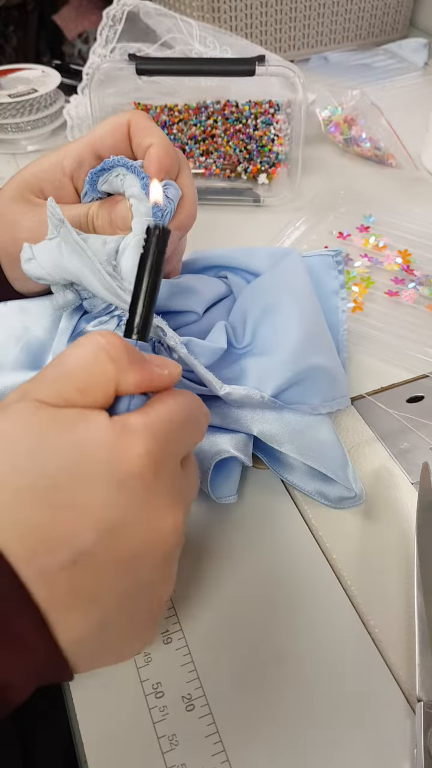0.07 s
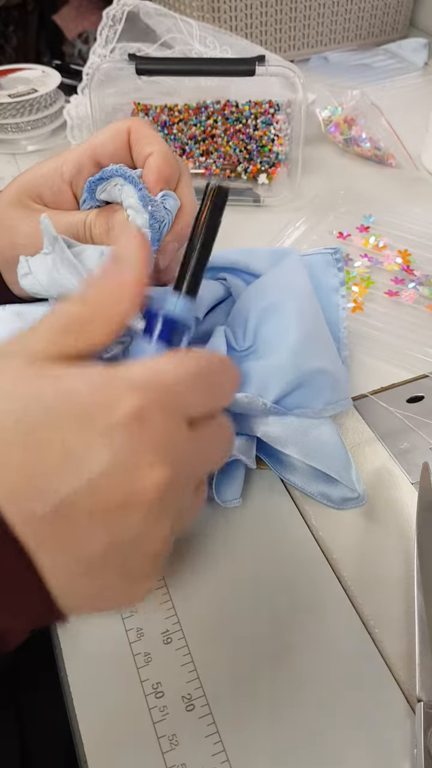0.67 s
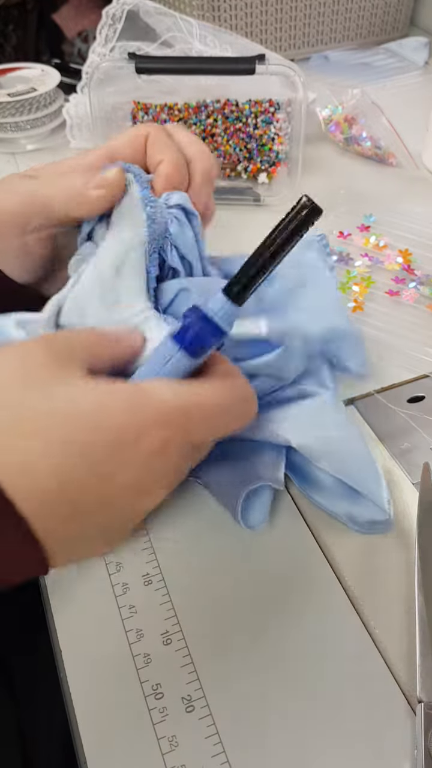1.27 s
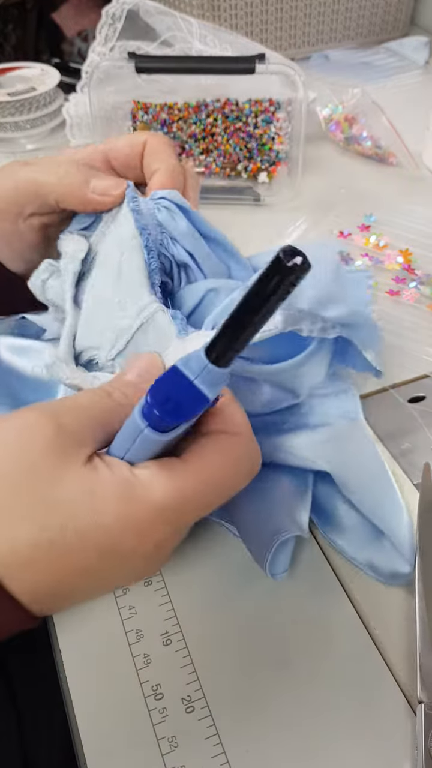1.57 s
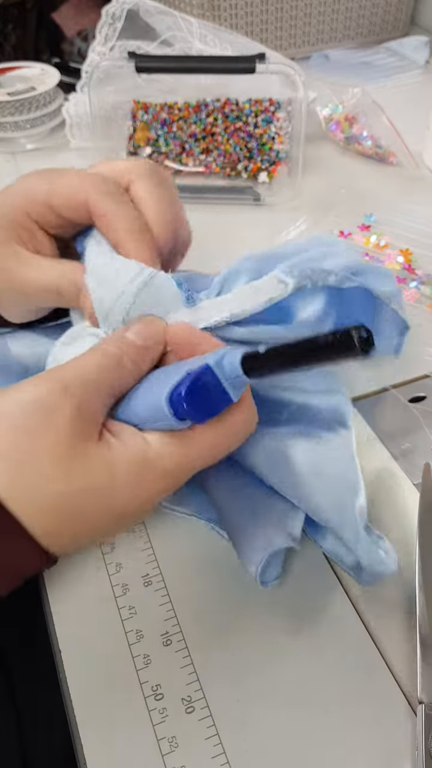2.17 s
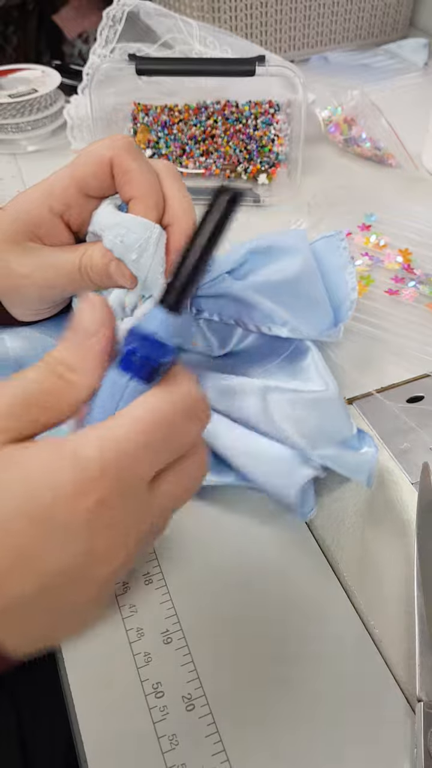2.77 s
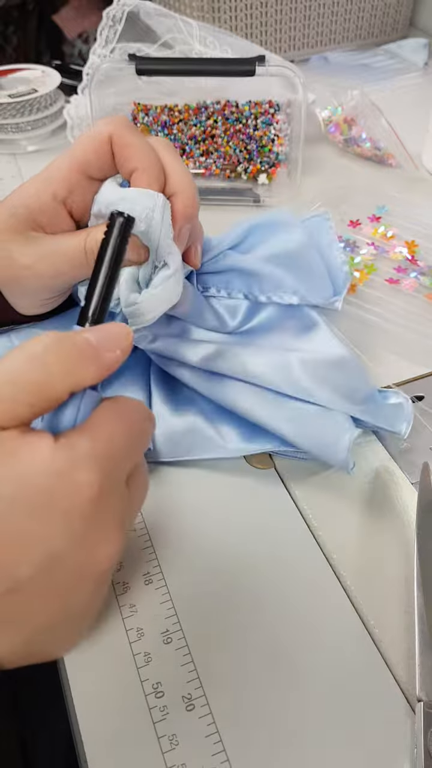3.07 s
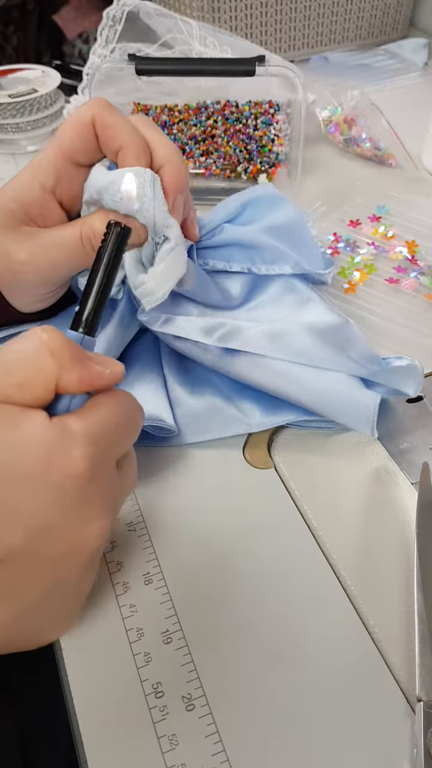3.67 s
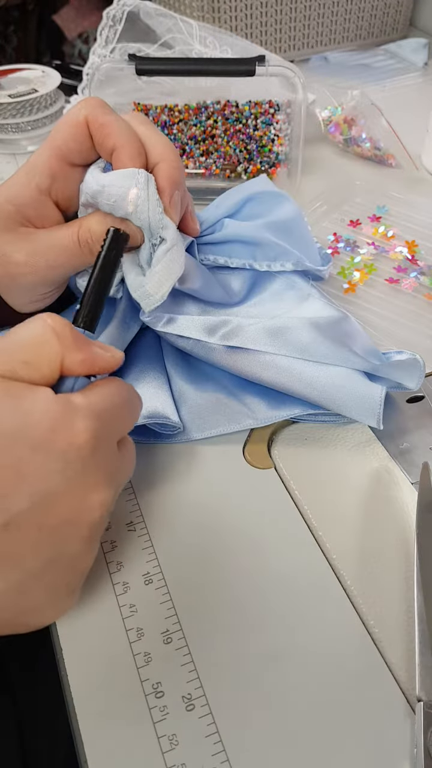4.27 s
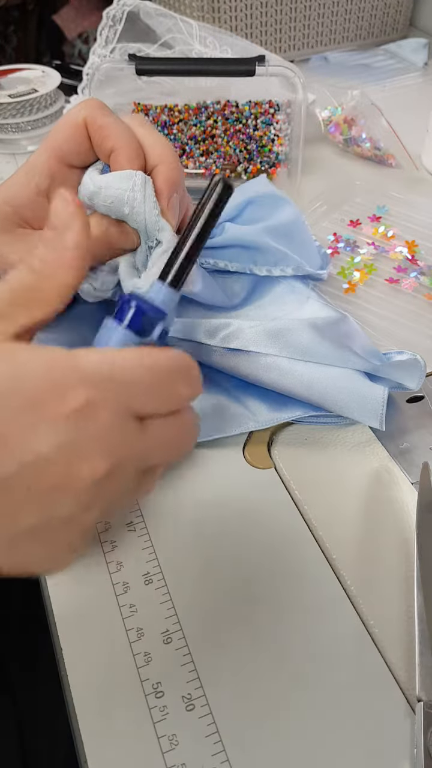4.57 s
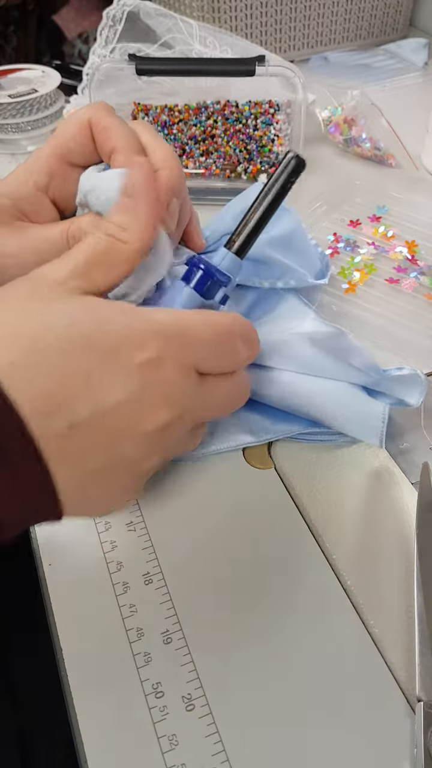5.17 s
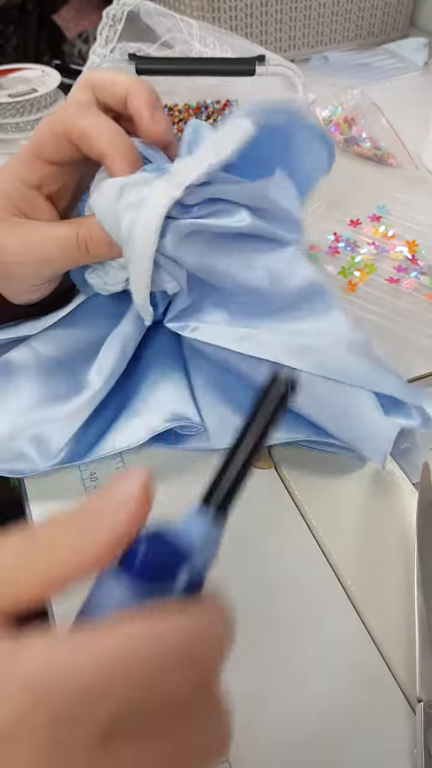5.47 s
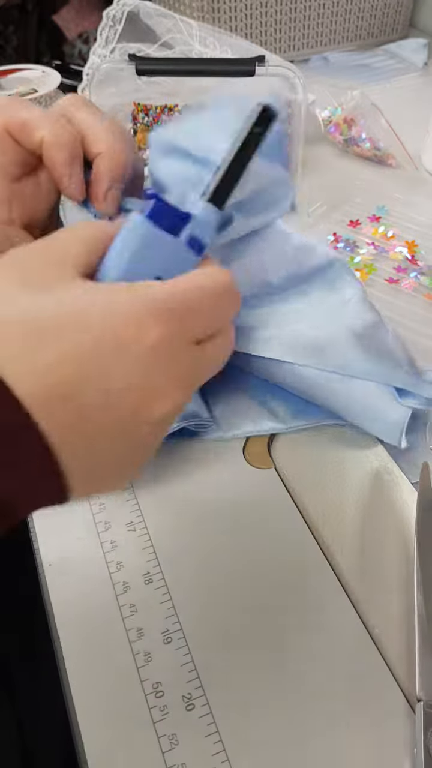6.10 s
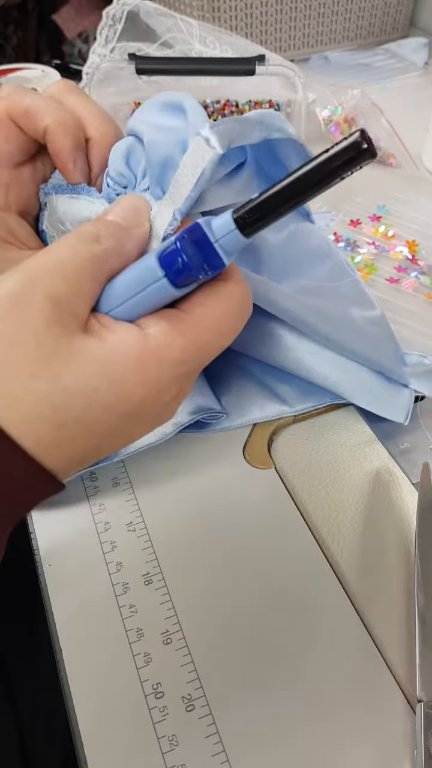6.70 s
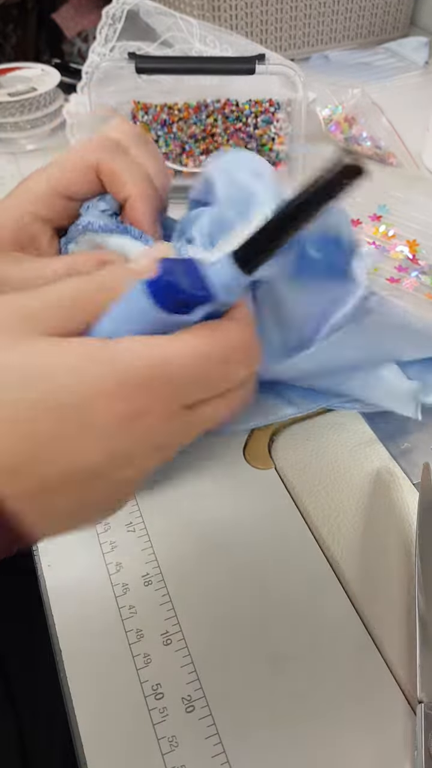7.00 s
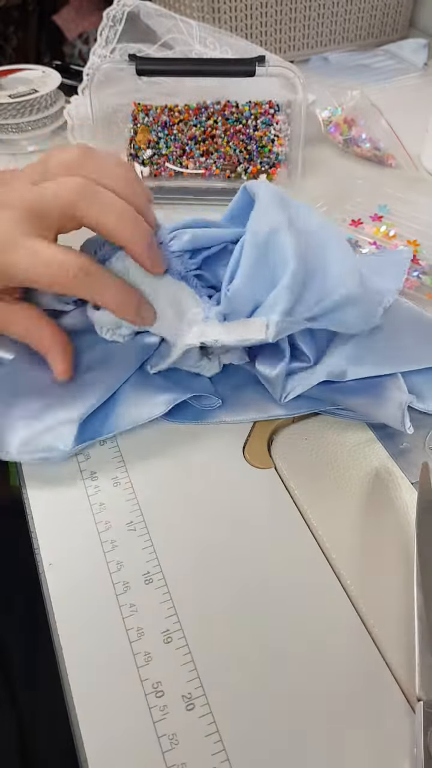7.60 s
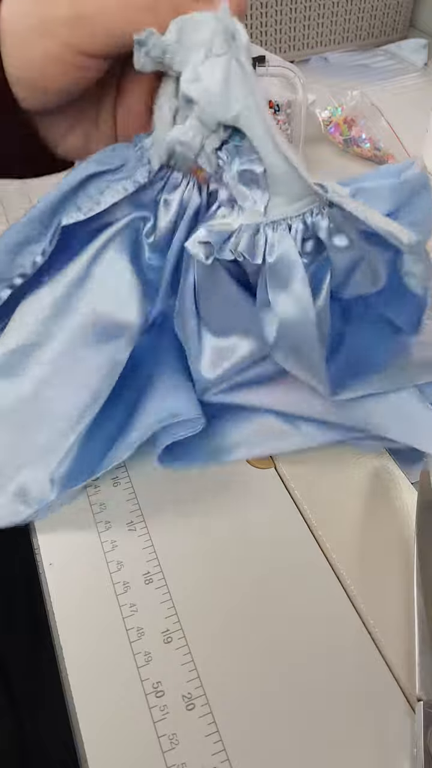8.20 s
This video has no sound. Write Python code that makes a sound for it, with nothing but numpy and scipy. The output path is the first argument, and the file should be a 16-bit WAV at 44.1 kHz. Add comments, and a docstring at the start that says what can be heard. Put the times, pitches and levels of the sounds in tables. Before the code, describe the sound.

Close, soft cloth swishes and sharp plastic lighter clicks, ending as the lighter is set down with a clack and brief scrape.

```python
"""A small gas flame flutters in a quiet room until the trigger of a long plastic lighter clicks free. Close by,
hands singe the edge of a satin doll's dress: the cloth swishes, rasps and snags as the fingers turn and rub it.
The trigger creaks down, a piezo hammer cracks, and a fainter flame burns for a second until the trigger springs
back. The nozzle knocks against the bead box once; at the end the lighter clacks down on the craft table to the
right and scrapes a little way."""
import sys
import numpy as np
from scipy import signal
from scipy.fft import rfft, irfft, next_fast_len
from scipy.io import wavfile
from scipy.ndimage import uniform_filter1d

SR = 44100
rng = np.random.default_rng(int(sys.argv[2]) if len(sys.argv) > 2 else 0)


def dump_mix(stems):
    """Bounce the given channels to the path in sys.argv[1] as a 16-bit WAV at rate SR."""
    frames = np.atleast_2d(stems).T  # one column per channel
    limited = np.clip(frames, -1, 1)  # hard clip at full scale
    pcm = np.round(limited * 32767).astype(np.int16)
    wavfile.write(sys.argv[1], SR, pcm)


N = 372644
TIME_S = np.arange(N) / SR


def amp(db):
    """Decibels to gain."""
    return 10 ** (np.asarray(db) / 20)


def unit_rms(x):
    """Scales to rms 1."""
    return x / np.sqrt(np.mean(x ** 2) + 1e-30)


def curve_at(curve, hz):
    """A curve's value at hz, on a log-frequency axis."""
    points_hz, values = np.transpose(curve)
    return np.interp(np.log(hz + 1), np.log(points_hz), values)


def add(mix, start_s, sound):
    """Mixes a sound in at start_s."""
    part = mix[:, round(start_s * SR):][:, :sound.shape[-1]]
    part += sound[..., :part.shape[1]]


def coloured(noise, spectrum):
    """Gives noise a spectrum and rms 1."""
    n = next_fast_len(N)
    gain = amp(curve_at(spectrum, np.fft.rfftfreq(n, 1 / SR)))
    return unit_rms(irfft(rfft(noise, n) * gain, n)[..., :N])


def stereo_noise(correlation):
    """Two channels of partly shared white noise."""
    left, other = rng.standard_normal((2, N))
    return np.array([left, correlation * left + np.sqrt(1 - correlation ** 2) * other])


def held(start_s, end_s, ease_s):
    """An envelope that eases in, holds and eases out."""
    return np.sin(np.pi / 2 * np.clip(np.minimum(TIME_S - start_s, end_s - TIME_S) / ease_s, 0, 1))


def movements(rows, ease_share=0.41):
    """Envelope of movements that gather speed and slow down; their powers add."""
    power = np.zeros(N)
    for middle_s, length_s, db in rows:
        envelope = held(middle_s - length_s / 2, middle_s + length_s / 2, ease_share * length_s)
        power += (amp(db) * envelope) ** 2
    return np.sqrt(power)


def waver(rate_hz, depth_db, count=24):
    """A gain that wanders at random, no faster than rate_hz."""
    t = TIME_S[::128]
    hz = rate_hz * np.geomspace(0.1, 1, count)[:, None]
    drift = unit_rms(np.sin(2 * np.pi * (hz * t + rng.random((count, 1)))).sum(0))
    return amp(depth_db * np.interp(TIME_S, t, drift))


def friction(spectrum, slips_per_s, spread_db, grain_share):
    """Countless tiny contacts hiss; a few larger slips stand out as grains."""
    slips = (rng.random(N) < slips_per_s / SR) * rng.standard_normal((2, N))
    slips *= amp(spread_db * np.minimum(rng.exponential(1, N), 4))
    hiss = np.sqrt(1 - grain_share) * stereo_noise(0.065)
    return coloured(np.sqrt(grain_share) * unit_rms(slips) + hiss, spectrum)


def patchy(x, depth_db, width_hz, span_s):
    """Changing contacts bring out passing patches of colour."""
    hz, t, frames = signal.stft(x, SR, nperseg=512, noverlap=384)
    patches = rng.standard_normal((len(t), len(hz))).T
    for axis, cells in enumerate([width_hz / hz[1], span_s / t[1]]):
        pole = np.exp(-1 / cells)
        patches = signal.lfilter([1 - pole], [1, -pole], patches, axis=axis)
    frames *= unit_rms(amp(depth_db * unit_rms(patches)))
    return signal.istft(frames, SR, nperseg=512, noverlap=384)[1][:, :N]


def impact(spectrum, tilt_db_per_oct, rattle_s, size=2048):
    """A brief rattle of contacts rings a body, with the energy of 10 ms at rms 1."""
    t, hz = np.arange(size) / SR, np.fft.rfftfreq(size, 1 / SR)
    rattle = rfft(rng.standard_normal(size) * np.exp(-(t / rattle_s) ** 2))
    rattle /= np.sqrt(uniform_filter1d(abs(rattle) ** 2, size=16)) + 1e-9  # even spectrum
    tilt_db = tilt_db_per_oct * np.log2(np.maximum(hz, 500) / 3000)
    log_gain = np.log(amp(curve_at(spectrum, hz) + tilt_db))
    mirrored = np.r_[log_gain, log_gain[-2:0:-1]]
    body = np.exp(np.conj(signal.hilbert(mirrored)))[:len(hz)]  # minimum phase
    blow = irfft(rattle * body) * np.minimum(1, 2 - 2 * t / t[-1])
    return blow / np.linalg.norm(blow) * np.sqrt(SR / 100)


def strikes(rows, spectrum):
    """All blows on one body."""
    out = np.zeros((1, N))
    for start_s, db, tilt_db_per_oct, rattle_s in rows:
        add(out, start_s, amp(db) * impact(spectrum, tilt_db_per_oct, rattle_s))
    return out


def ring(modes, start_s, rise_s):
    """Modes swell quickly after a blow and die away."""
    out, t = np.zeros((1, N)), np.arange(SR // 4) / SR
    tones = sum(amp(db - 60 * t / t60_s) * np.sin(2 * np.pi * hz * t) for hz, db, t60_s in modes)
    add(out, start_s, tones * (1 - np.exp(-t / rise_s)))
    return out


# Balance of sounds from the hands. Each row: frequency in Hz, left minus right in dB.
HANDS_BALANCE = [(100, 2), (1000, 4), (2500, 5.5), (4300, 12.5), (6500, -1.5), (9500, 12.5), (12500, 10),
                 (15000, -0.5)]
def shaded(x, balance=HANDS_BALANCE, share=1):
    """The phone's body shades one microphone, differently at each frequency."""
    n = next_fast_len(N + SR // 10)
    half_db = share * curve_at(balance, np.fft.rfftfreq(n, 1 / SR)) / 2
    gains = amp([half_db, -half_db])
    gains /= np.sqrt((gains ** 2).mean(0))
    return irfft(rfft(x, n) * gains, n)[:, :N]


# Room decay. Each row: frequency in Hz, T60 in seconds.
ROOM_DECAY = [(100, .3), (500, 0.25), (1200, .16), (2400, 0.21), (5000, .18), (10000, .155), (16000, .14)]
def room_tail():
    """Dense random reflections, each band dying at its own speed."""
    t = np.arange(SR // 2) / SR
    taps = rng.standard_normal((2, len(t))) * np.clip((t - 0.002) / 0.0036, 0, 1)
    hz, age_s, frames = signal.stft(taps, SR, nperseg=256)
    decay = amp(-60 * age_s / curve_at(ROOM_DECAY, hz)[:, None])
    tail = signal.istft(frames * decay, SR, nperseg=256)[1]
    return unit_rms(tail) / np.sqrt(tail.shape[1])


# Echoes off nearby surfaces. Each row: delay in seconds, relative gain.
NEAR_ECHOES = [(.0035, 0.23), (.0062, .22), (.0083, .36), (.0096, .25), (0.0131, .08)]
def placed(x, wet_db, echo_db=0, left_lead_s=0.0001, balance=HANDS_BALANCE):
    """Direct sound reaches the two microphones in turn, then near echoes and the room."""
    near = np.zeros((2, N))
    add(near[:1], max(-left_lead_s, 0), x)
    add(near[1:], max(left_lead_s, 0), x)
    for delay_s, gain in NEAR_ECHOES:
        echo = gain * amp(echo_db) * x
        add(near[:1], delay_s, echo)
        add(near[1:], delay_s + rng.uniform(0, 0.0006), echo)
    tail = signal.fftconvolve(x, room_tail(), axes=1)[:, :N]
    return shaded(near, balance) + amp(wet_db) * shaded(tail, balance, share=0.5)


# Room rumble and microphone hiss. Each row: frequency in Hz, relative level in dB.
RUMBLE_SPECTRUM = [(20, -30.5), (35, -10), (50, -1), (70, 4.5), (95, -6), (120, -1), (160, -17.5),
                   (230, -21), (400, -27), (1000, -50.5)]
HISS_SPECTRUM = [(100, 0.5), (400, -0.5), (1000, -2), (3000, -7.5), (5300, -5.5), (6500, -14),
                 (7600, -20.5), (8500, -25.5), (9300, -10.5), (11000, -2), (13000, 1), (15500, -0.5)]
# Forearms pressing on the table. Each row: middle in seconds, length in seconds, level in dB.
ARM_LEANS = [(.45, 1.56, -63), (1.18, 0.43, -61), (1.98, 0.29, -65), (2.72, 1.2, -65), (3.45, 0.4, -51),
             (3.72, 0.34, -64.5), (4.58, 0.31, -67), (5.58, 0.19, -65), (6.66, .28, -62), (7.35, 1.2, -63),
             (8.42, 0.71, -59)]
def background(rumble_db=-68, hiss_db=-70.5):
    """Low room rumble swells as the arms lean on the table; the microphones hiss."""
    level = np.hypot(amp(rumble_db) * waver(rate_hz=5, depth_db=1.5), movements(ARM_LEANS))
    rumble = shaded(level * coloured(stereo_noise(0.88), RUMBLE_SPECTRUM))
    return rumble + amp(hiss_db) * coloured(stereo_noise(0), HISS_SPECTRUM)


# Hand bumps. Each row: start in seconds, peak level in dB, pitch in Hz, swell in seconds.
TABLE_BUMPS = [(3.268, -53.5, 105.5, .022), (3.349, -43.5, 102.9, 0.023), (3.411, -37.5, 104, 0.017),
               (3.417, -56.5, 288, 0.0071), (3.511, -40, 100, 0.016), (3.509, -49, 300, .004),
               (3.552, -49, 250, .005), (4.55, -59.5, 150, .012), (7.68, -54, 118, 0.013),
               (8.356, -55, 375, 0.0048), (8.413, -42.5, 343, 0.0064)]
def table_bumps():
    """Soft pushes make the table top hum briefly."""
    out, t = np.zeros((2, N)), np.arange(SR // 3) / SR
    for start_s, db, hz, swell_s in TABLE_BUMPS:
        envelope = t / swell_s * np.exp(1 - t / swell_s)
        add(out, start_s, amp(db) * envelope * np.sin(2 * np.pi * hz * t))
    return out


def settling(level, settle_s=0.099, settle_db=-8.5):
    """Extends a stroke's envelope: loose folds go on sliding."""
    pole = np.exp(-1 / (settle_s * SR))
    fold_power = signal.lfilter([1 - pole], [1, -pole], (amp(settle_db) * level) ** 2)
    return np.sqrt(level ** 2 + fold_power)


# Satin on satin, and fingers on satin. Each row: frequency in Hz, relative level in dB.
SATIN_SPECTRUM = [(200, -10), (700, -8.5), (1500, -10.5), (3000, -13.5), (4400, 0), (6000, -0.5),
                  (7000, -7.5), (8000, -17.5), (10000, -5), (12000, -4), (15500, -13)]
FINGER_SPECTRUM = [(150, 2), (400, -8.5), (700, -15.5), (1100, -3.5), (1800, -1), (2600, 0.5), (3300, 1),
                   (4200, -4.5), (7000, -21), (15000, -36.5)]
# Hand strokes. Each row: middle and length in seconds, satin and finger levels in dB before trim.
CLOTH_STROKES = [(.005, .09, -72.5, -66.5), (0.594, 0.11, -71, -70), (1.3, 0.6, -70.5, -79.5),
                 (1.86, 0.77, -77, -88), (2.17, 0.27, -70, -76), (2.247, 0.21, -66, -70),
                 (2.325, 0.095, -68, -63), (2.487, .22, -64, -72.5), (2.602, 0.097, -67, -69.5),
                 (2.699, 0.14, -62.5, -68), (2.832, 0.14, -67, -84), (2.916, 0.18, -80, -73),
                 (3.44, .08, -65, -73), (5.257, 0.25, -79, -82.5), (5.413, 0.12, -66.5, -67),
                 (5.493, .13, -70, -65.5), (5.6, .2, -74.5, -83), (5.855, 0.15, -64.5, -71),
                 (6.009, .09, -70, -68.5), (6.151, 0.26, -65.5, -64), (6.348, 0.17, -66, -66.5),
                 (6.458, .2, -76.5, -78), (6.907, 0.26, -74, -75), (6.996, 0.16, -68.5, -72.5),
                 (7.134, 0.16, -62.5, -66.5), (7.323, .34, -69, -66.5), (7.444, 0.16, -66.5, -62),
                 (7.72, 0.66, -72.5, -78), (8.006, 0.21, -68.5, -67.5)]
def cloth_strokes(satin_trim_db=1.3, finger_trim_db=-1):
    """Satin slides over itself brightly, fingers rub it more dully; folds give way unevenly."""
    slide = movements([(s, length_s, db + satin_trim_db) for s, length_s, db, _ in CLOTH_STROKES])
    rub = movements([(s, length_s, db + finger_trim_db) for s, length_s, _, db in CLOTH_STROKES])
    swish = friction(SATIN_SPECTRUM, slips_per_s=1200, spread_db=3, grain_share=0.37)
    scuff = friction(FINGER_SPECTRUM, slips_per_s=700, spread_db=2.5, grain_share=0.22)
    scuff = patchy(scuff, depth_db=4, width_hz=300, span_s=0.04)
    cloth = settling(slide) * swish + settling(rub) * scuff
    return shaded(cloth * waver(rate_hz=40, depth_db=0.97), share=0.91)


# Finger drags on taut cloth. Each row: middle and length in seconds, level in dB,
# first pitch, last pitch and bandwidth in Hz.
WEAVE_RASPS = [(1.172, 0.11, -73.5, 950, 1042, 650), (2.107, .1, -72.5, 990, 1102, 700),
               (2.702, 0.093, -65, 2420, 2247, 800), (2.855, 0.22, -61.5, 3920, 2084, 1670),
               (5.834, 0.2, -61, 3035, 3310, 930), (5.828, .15, -77, 1700, 1850, 452),
               (6.157, .2, -62.5, 4180, 3770, 2200), (6.19, 0.18, -65.5, 2296, 1505, 1310),
               (7.33, 0.24, -69.5, 1186, 947, 800), (7.45, 0.15, -79.5, 1700, 1965, 894)]
def weave_rasps():
    """The weave ticks past the finger: a noise band that glides with the stroke's speed."""
    out = np.zeros((2, N))
    for middle_s, length_s, db, first_hz, last_hz, width_hz in WEAVE_RASPS:
        n = int(length_s * SR)
        pole = np.exp(-np.pi * width_hz / SR)
        band = rng.standard_normal((2, n)) + 1j * rng.standard_normal((2, n))
        for _ in range(2):
            band = signal.lfilter([1 - pole], [1, -pole], band)
        glide = np.exp(2j * np.pi * np.cumsum(np.linspace(first_hz, last_hz, n)) / SR)
        add(out, middle_s - length_s / 2, amp(db) * unit_rms((band * glide).real) * np.hanning(n))
    return shaded(out, share=0.56)


# Thread tick. Each row: frequency in Hz, relative level in dB.
THREAD_SPECTRUM = [(200, -18), (1200, -9.5), (2500, -14), (4500, 8.5), (6200, 3), (8000, -2), (11500, 10.5),
                   (13000, 5), (15500, -1)]
# Snags. Each row: start in seconds, level in dB, tilt in dB per octave, rattle in seconds.
THREAD_SNAGS = [(1.2058, -67, -7, 0.00087), (1.2976, -60, 5, 0.0011), (1.314, -60, 8, .004),
                (1.3873, -60.5, 4, 0.0011), (1.4307, -58.5, -1.5, 0.0033), (1.5819, -67, 8, .001),
                (2.2464, -57, 7, .005), (2.308, -60, -3, 0.0021), (2.3387, -51, -3, 0.0018),
                (2.5861, -53.5, 10, .001), (2.6086, -61, 0, .002), (4.9542, -70, -6, 0.0022),
                (5.4032, -54.5, 8, .002), (5.4242, -57.5, 4, .003), (6.9791, -64, -5, .003),
                (7.4311, -66, -3, .002)]
def thread_snags():
    """Threads catch and creases snap."""
    return placed(strikes(THREAD_SNAGS, THREAD_SPECTRUM), wet_db=-4, left_lead_s=0.0003)


# Flame flutter. Each row: frequency in Hz, relative level in dB.
FLAME_SPECTRUM = [(40, -16), (90, -6.5), (135, 9), (165, -7.5), (200, -15), (300, -18), (500, -34),
                  (2000, -56.5)]
# Burns. Each row: start in seconds, end in seconds, level in dB.
FLAME_BURNS = [(0, 0.627, -62), (3.51, 4.531, -85)]
def flame(fade_s=0.14, whump_s=3.2, whump_db=-66, swell_s=0.04):
    """The flame flutters and shrinks as the valve closes; a soft low whump precedes the trigger press."""
    burning = sum(amp(db) * (TIME_S >= lit_s) * np.clip((end_s - TIME_S) / fade_s, 0, 1)
                  for lit_s, end_s, db in FLAME_BURNS)
    whump_age = np.maximum(TIME_S - whump_s, 0) / swell_s
    whump = amp(whump_db) * whump_age * np.exp(1 - whump_age)
    return (burning + whump) * coloured(stereo_noise(0.93), FLAME_SPECTRUM)


# Plastic sliding on the table. Each row: frequency in Hz, relative level in dB.
SCRAPE_SPECTRUM = [(200, -27), (1100, -17), (1600, -5), (2200, -8), (2900, 0), (3550, -3.5), (4200, -4.5),
                   (5200, -6.5), (6400, -5), (7800, -20.5), (10500, -14), (15500, -20)]
def table_scrape(start_s=8.075, end_s=8.46, start_db=-59, rise_db_per_s=8):
    """The lighter scrapes across the table, pressed harder as the hand lets it down."""
    pressure = amp(start_db + rise_db_per_s * (TIME_S - start_s))
    scrape = friction(SCRAPE_SPECTRUM, slips_per_s=400, spread_db=2.3, grain_share=0.28)
    scrape = patchy(scrape, depth_db=3.5, width_hz=350, span_s=0.031)
    return pressure * held(start_s, end_s, ease_s=0.027) * scrape


# Casing clack and board thud. Each row: frequency in Hz, relative level in dB.
CLACK_SPECTRUM = [(200, -36), (700, -21), (1300, -13), (1800, 4.5), (2250, 7), (2800, -10.5), (4300, -1.5),
                  (6000, -3), (7700, -19.5), (10000, -14), (13500, -14), (15500, -24)]
THUD_SPECTRUM = [(50, -12), (130, -6.5), (250, -8), (400, 1), (620, -12.5), (830, -6), (1080, -2),
                 (2000, -10), (8000, -60)]
# Balance of sounds at the right. Each row: frequency in Hz, left minus right in dB.
RIGHT_BALANCE = [(100, -9), (2000, 9), (3000, -3), (5000, -11), (7500, -19), (10500, 10), (15000, -18)]
# Landings. Each row: start in seconds, level in dB, tilt in dB per octave, rattle in seconds,
# thud in dB relative to the clack.
LANDINGS = [(8.0664, -33.5, 2.5, 0.0021, -31), (8.0693, -33.5, 1, 0.0016, -30.5),
            (8.354, -47, 1.5, 0.0023, -18.5), (8.4081, -44, 2, 0.0017, -13),
            (8.4113, -23.5, 0, 0.00053, -13.5), (8.4129, -23.5, -3.5, 0.0011, -16.5),
            (8.427, -40.5, 1, 0.0045, -6.5)]
def set_down():
    """The casing clacks on the table, and the board answers with a thud."""
    clacks = strikes([row[:4] for row in LANDINGS], CLACK_SPECTRUM)
    thud_rows = [(s, db + thud_db, 0, rattle_s) for s, db, _, rattle_s, thud_db in LANDINGS]
    thuds = strikes(thud_rows, THUD_SPECTRUM)
    return (placed(clacks, wet_db=-7.5, left_lead_s=-0.0003, balance=RIGHT_BALANCE)
            + placed(thuds, wet_db=2, left_lead_s=-0.00036, balance=RIGHT_BALANCE))


# Nozzle against the bead box. Each row: frequency in Hz, relative level in dB.
NOZZLE_SPECTRUM = [(200, -35), (650, -34), (950, -13.5), (1400, -14.5), (1900, -8), (2330, 8), (2700, 3),
                   (3200, -18), (4300, -13), (7500, -40), (15000, -39)]
# Contacts. Each row: start in seconds, level in dB, tilt in dB per octave, rattle in seconds.
NOZZLE_CONTACTS = [(6.0822, -55, -7, 0.0028), (6.1086, -40, -1.5, 0.0019), (6.1222, -38.5, -0.5, 0.0033)]
def nozzle_knock(pan_left_db=3):
    """The nozzle knocks against the bead box in three quick contacts."""
    knock = strikes(NOZZLE_CONTACTS, NOZZLE_SPECTRUM)
    pan = amp([[pan_left_db / 2], [-pan_left_db / 2]])
    return pan * placed(knock, wet_db=-12, echo_db=0.5, left_lead_s=0.00018)


# Safety catch. Each row: frequency in Hz, relative level in dB.
CATCH_SPECTRUM = [(200, -14), (700, -29), (1300, 1.5), (1750, -2.5), (2150, 1.5), (2900, -7.5), (4050, 5),
                  (5000, -6), (6300, -11), (7800, -29), (11000, -15.5), (15500, -25)]
# Grip shifts. Each row: start in seconds, level in dB, tilt in dB per octave, rattle in seconds.
GRIP_SHIFTS = [(2.9838, -52.5, -1, 0.0018), (3.0549, -51.5, 1, 0.0014)]
def safety_catch():
    """The catch ticks as the thumb shifts its grip."""
    return placed(strikes(GRIP_SHIFTS, CATCH_SPECTRUM), wet_db=-0.5)


# Plastic casing. Each row: frequency in Hz, relative level in dB.
CASING_SPECTRUM = [(150, -16.5), (550, -26.5), (850, -13), (1280, 2.5), (1950, -10.5), (2520, 1),
                   (3200, -9), (3950, -1), (4500, -6.5), (5100, 0.5), (6000, -4.5), (7800, -20),
                   (10200, -9.5), (15500, -17.5)]
# Return spring. Each row: frequency in Hz, relative level in dB, T60 in seconds.
SPRING_MODES = [(5550, -1, 0.013), (5280, -5, 0.015), (5120, -8.5, 0.013), (1290, -16.5, 0.013)]
# Clicks. Each row: start in seconds, level in dB, tilt in dB per octave, rattle in seconds.
TRIGGER_CLICKS = [(0.163, -77, -6, .002), (0.6332, -38, 0, 0.0027), (0.658, -48.5, -6, 0.0023),
                  (3.362, -58, -3, 0.0055), (3.384, -58.5, -4, .006), (3.42, -50.5, -4, 0.0039),
                  (3.4467, -59.5, 3.5, 0.0033), (4.451, -42.5, 4, 0.0028), (4.5175, -58.5, -2, .004),
                  (4.5342, -35, 3.5, 0.0019), (4.5602, -47, -3.5, 0.0015)]
def trigger(release_s=4.5341, spring_gain_db=-9):
    """The trigger clicks in its casing; let go sharply, it sets the spring ringing."""
    clicks = placed(strikes(TRIGGER_CLICKS, CASING_SPECTRUM), wet_db=-6.5, echo_db=-1.5)
    spring = amp(spring_gain_db) * ring(SPRING_MODES, release_s, rise_s=0.0006)
    return clicks + placed(spring, wet_db=-17, echo_db=-2, balance=[(1, 9)])  # 9 dB to the left


def trigger_creak(start_s=3.283, period_s=0.018, first_db=-69, last_db=-62, count=4):
    """Under growing pressure the trigger sticks and slips on its way down."""
    times_s = start_s + period_s * np.arange(count) + rng.normal(0, 0.0012, count)
    levels_db = np.linspace(first_db, last_db, count)
    slips = [(s, db, -4.5, 0.009) for s, db in zip(times_s, levels_db)]  # columns as TRIGGER_CLICKS
    return placed(strikes(slips, CASING_SPECTRUM), wet_db=-5)


# Hammer crack. Each row: frequency in Hz, relative level in dB.
HAMMER_SPECTRUM = [(150, -20), (400, -21.5), (560, -29), (950, -7), (1550, -10), (2350, 1), (3100, -8),
                   (3700, -1.5), (4400, -6.5), (5100, -1.5), (7700, -18.5), (10500, -8), (12700, -3.5),
                   (15500, -20)]
# Barrel modes. Each row: frequency in Hz, level in dB, T60 in seconds.
BARREL_MODES = [(870, -37, .06), (997, -37, 0.091), (1075, -40, .06), (2550, -29, .09), (2720, -39, .14),
                (3619, -33, 0.14), (3820, -31, 0.07), (4737, -41, 0.13), (6254, -39, 0.11)]
# Blow and rebounds. Each row: start in seconds, level in dB, tilt in dB per octave, rattle in seconds.
HAMMER_BLOWS = [(3.507, -20, 0, .0018), (3.5115, -31, -4.5, .003), (3.556, -47, -7, .004)]
def piezo_hammer():
    """The piezo hammer cracks and rebounds; the barrel rings on."""
    blows = strikes(HAMMER_BLOWS, HAMMER_SPECTRUM)
    crack = placed(blows, wet_db=-2.5, echo_db=2.5, left_lead_s=0.0003)
    barrel = ring(BARREL_MODES, start_s=HAMMER_BLOWS[0][0], rise_s=0.002)
    return crack + shaded(barrel, share=0.7)


def scene():
    """Lighter, cloth and table in the room."""
    handling = safety_catch() + nozzle_knock() + thread_snags()
    lighter = trigger() + trigger_creak() + piezo_hammer() + set_down() + table_scrape() + flame()
    cloth = cloth_strokes() + weave_rasps()
    return handling + lighter + cloth + table_bumps() + background()


def record(dry):
    """Steep low-pass at 15.9 kHz."""
    lowpass = signal.firwin(511, 15900, window=("kaiser", 9), fs=SR)
    return signal.oaconvolve(dry, lowpass[None], "same")


dry = scene()
out = record(dry)
dump_mix(out)
```